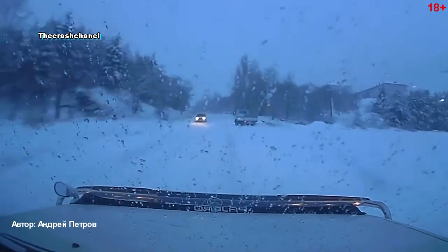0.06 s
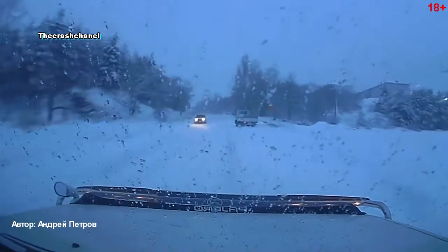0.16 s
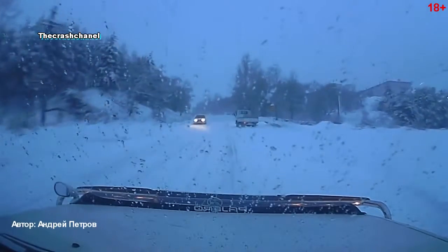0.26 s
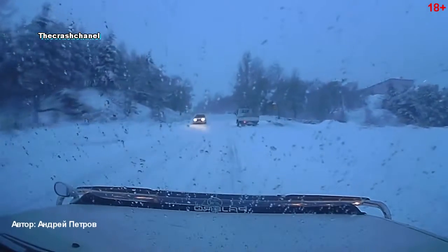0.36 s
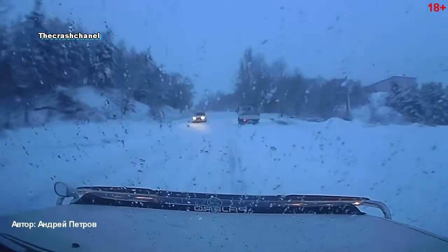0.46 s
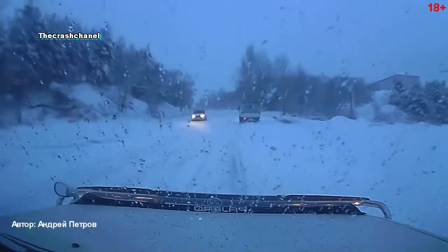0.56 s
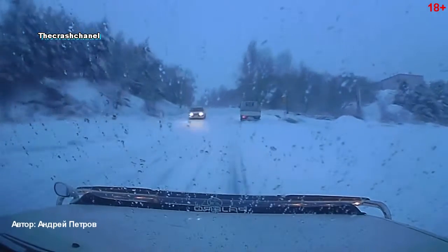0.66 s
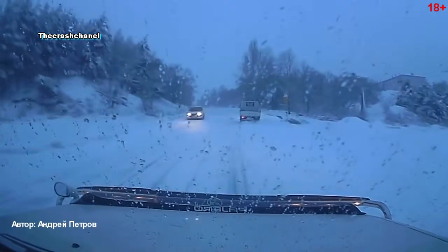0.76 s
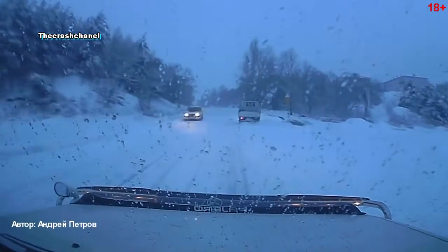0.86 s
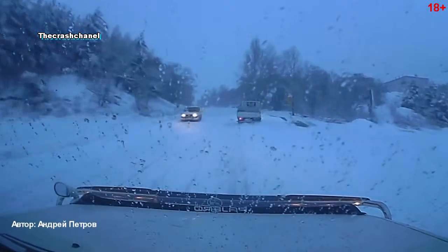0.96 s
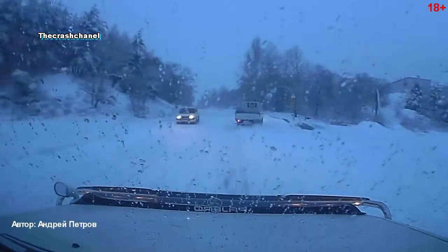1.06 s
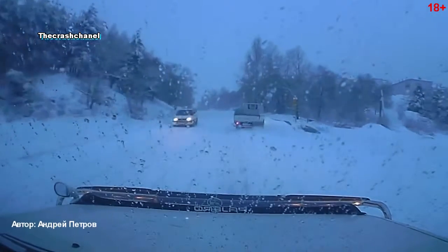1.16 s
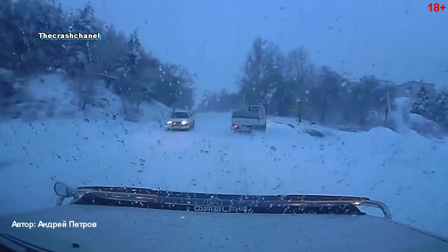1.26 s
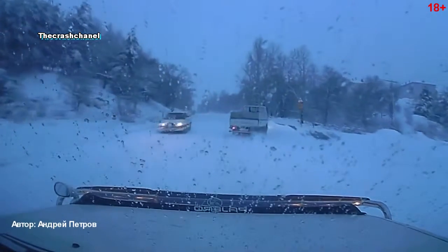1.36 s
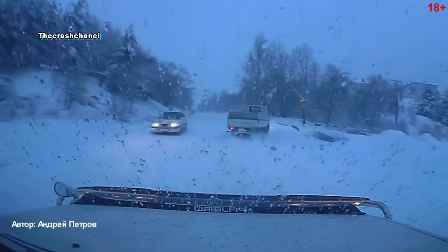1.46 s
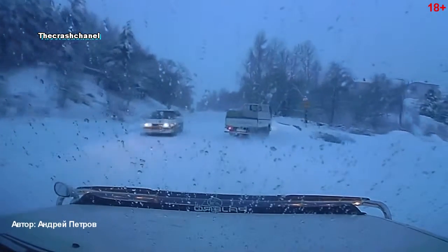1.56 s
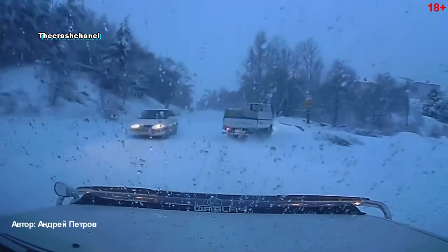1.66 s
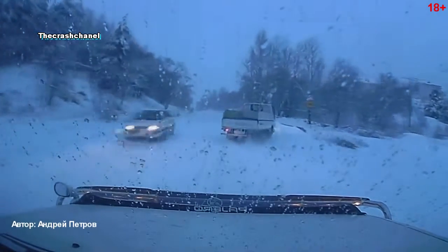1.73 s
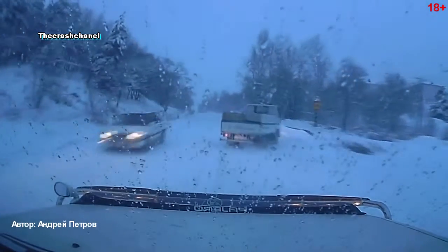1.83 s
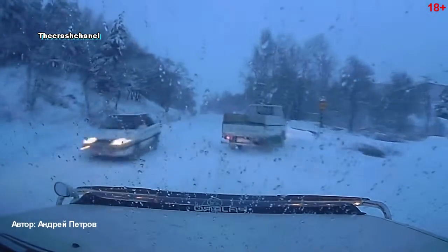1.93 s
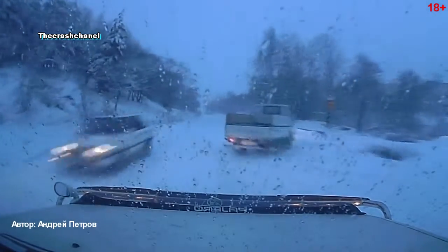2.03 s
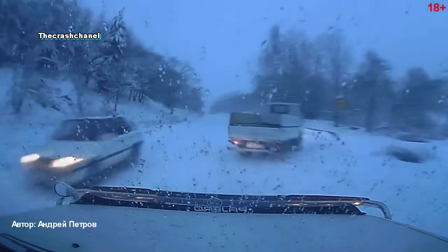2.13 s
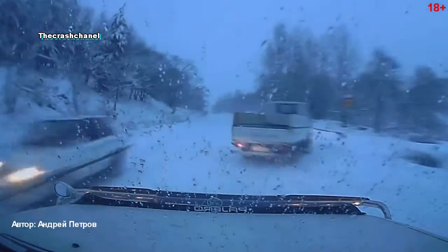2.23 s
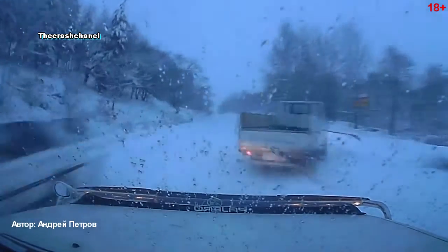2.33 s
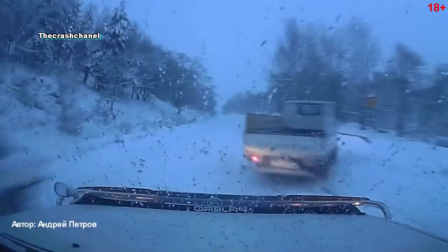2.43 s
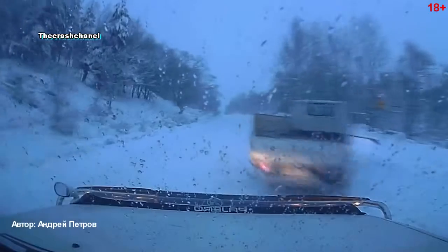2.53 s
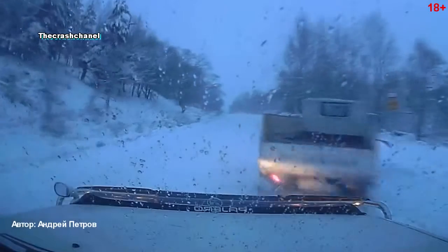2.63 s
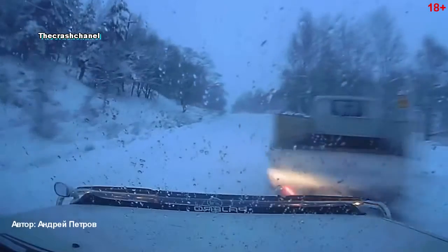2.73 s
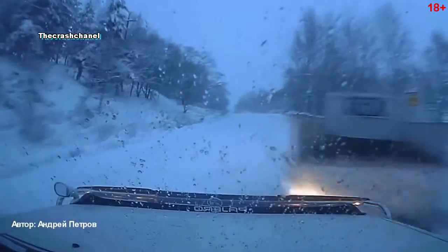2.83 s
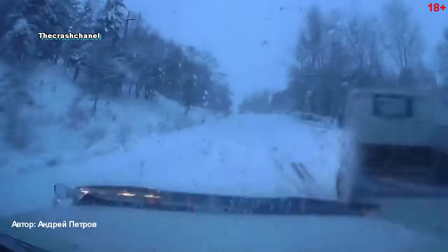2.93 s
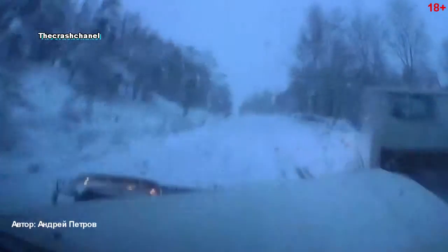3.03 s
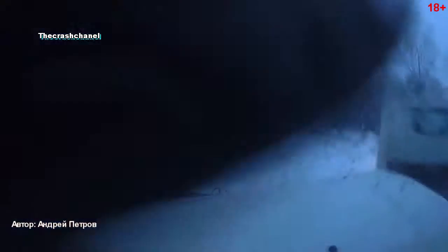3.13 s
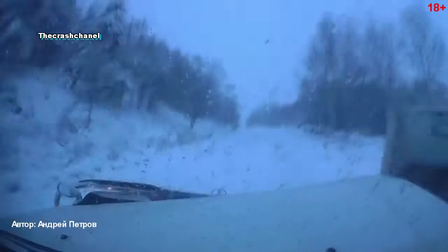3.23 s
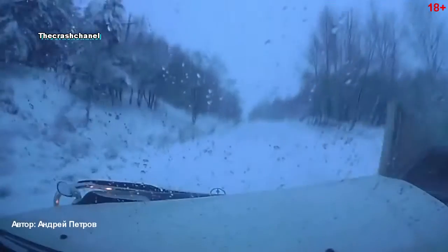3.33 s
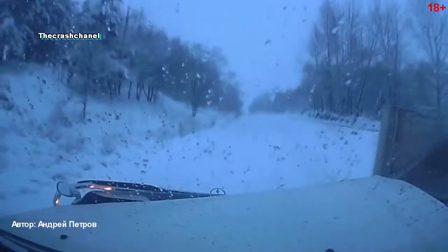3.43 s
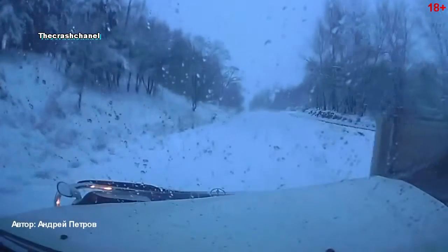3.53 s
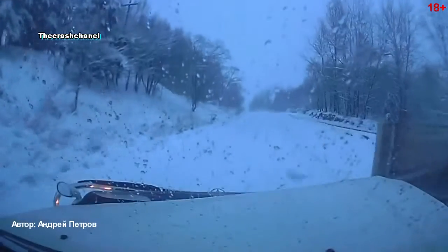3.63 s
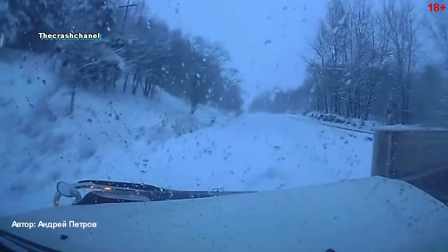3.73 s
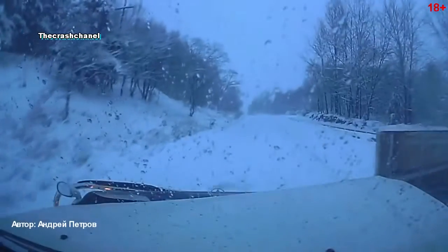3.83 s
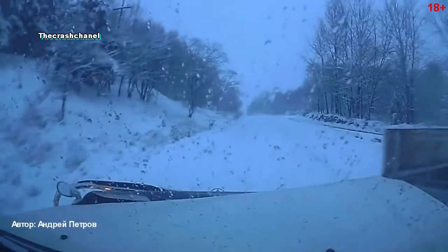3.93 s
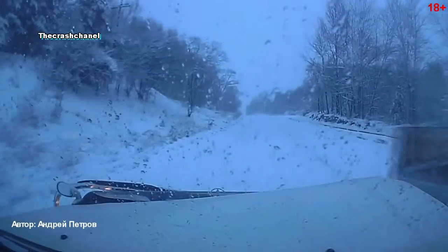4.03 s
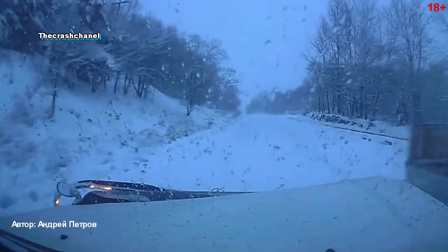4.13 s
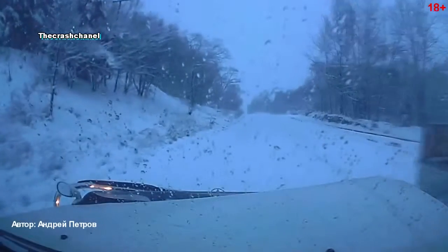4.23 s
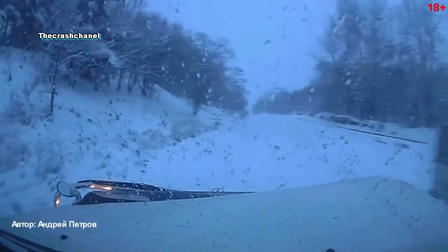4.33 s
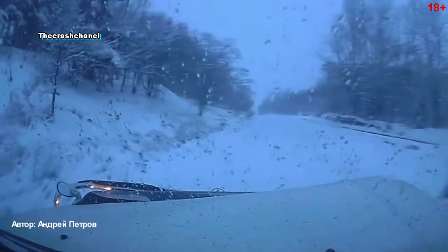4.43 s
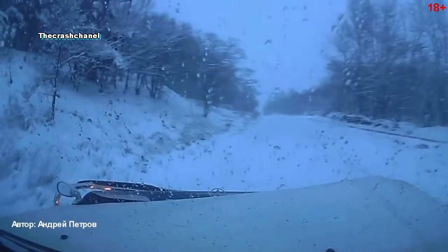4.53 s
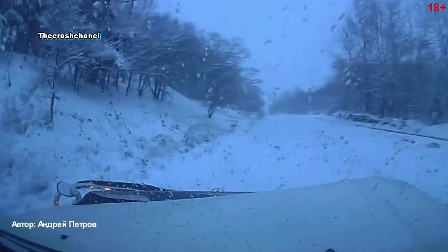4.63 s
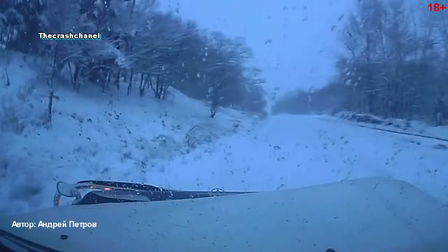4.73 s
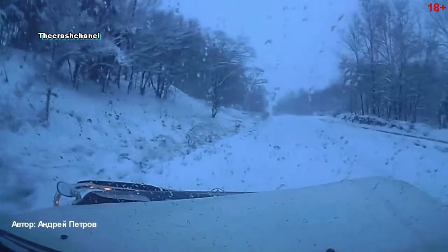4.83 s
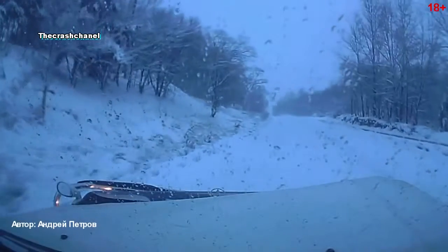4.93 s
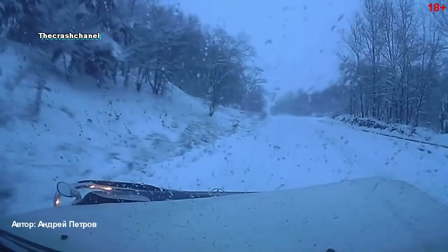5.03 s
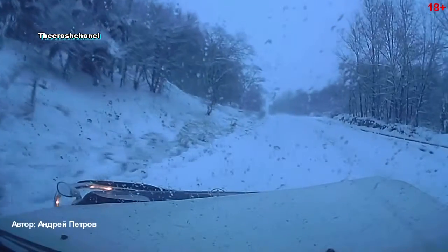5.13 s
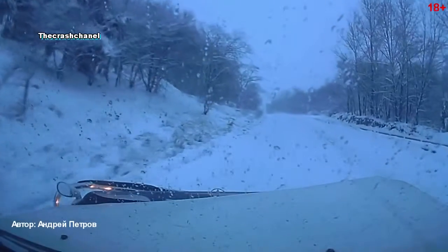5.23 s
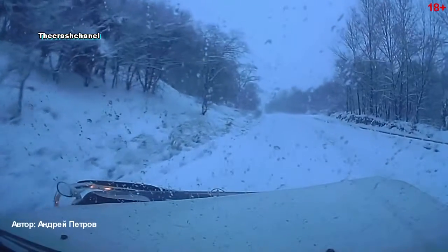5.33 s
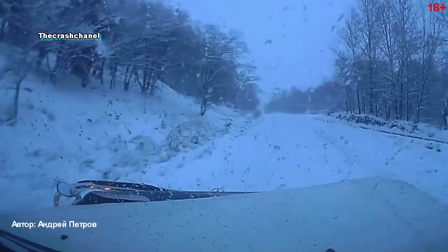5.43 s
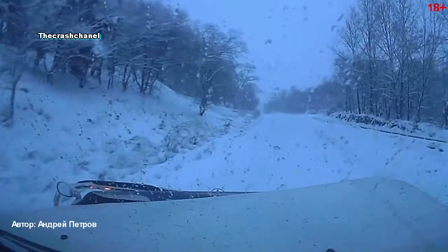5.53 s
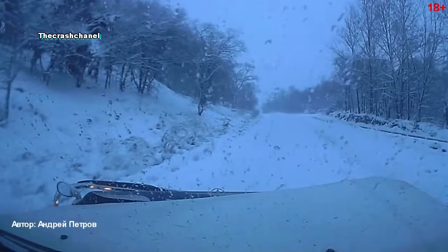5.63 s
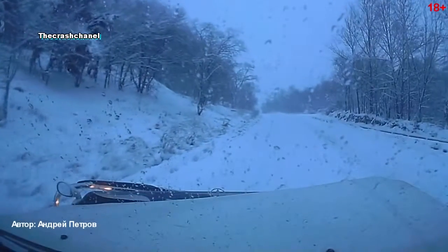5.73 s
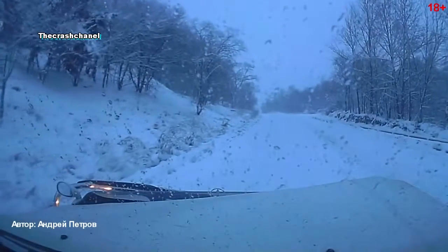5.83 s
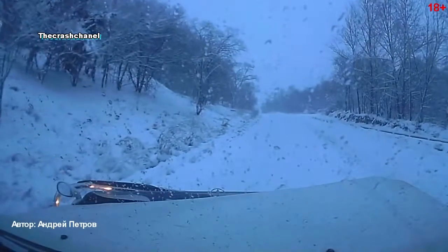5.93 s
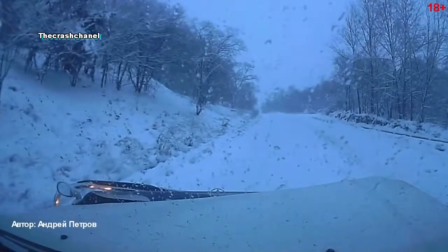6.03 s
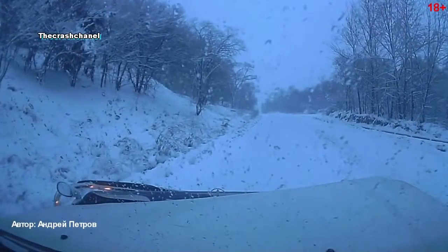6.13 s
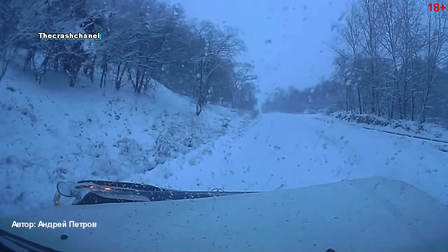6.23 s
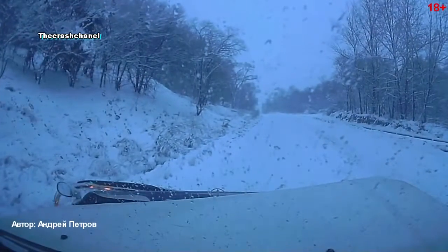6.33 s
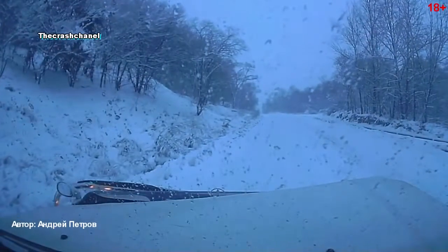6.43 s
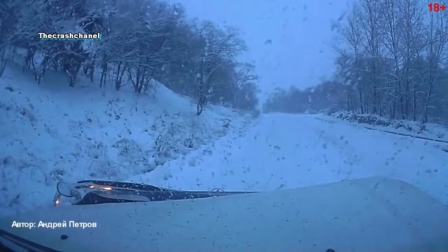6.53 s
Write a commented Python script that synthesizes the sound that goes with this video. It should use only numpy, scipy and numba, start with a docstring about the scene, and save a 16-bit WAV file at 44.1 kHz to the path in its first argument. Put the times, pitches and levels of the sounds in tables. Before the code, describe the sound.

Inside a car sliding on snow, quiet muffled road noise and faint rattles break into a violent metallic crash, tinkling glass, then snow crunching and juddering.

```python
"""A car's front crumples against the back of a small truck: grain bursts in a body-shell filter, plus pressure steps.
Heard from the windscreen while sliding on packed snow: parts clatter (noise bursts), glass tinkles (sine modes).
Tyres then judder (slip pulses) and crunch (grains) through deep snow until the car stands; dull low blows
(sagging sines) fall before, during and after. Behind: engine (sine orders), squeaks, thrown snow and road (noise).
The microphone stage clips and recovers slowly."""
import sys
import numpy as np
from scipy import signal
from scipy.fft import rfft, irfft, next_fast_len
from scipy.io import wavfile
from scipy.ndimage import map_coordinates
from numba import njit

SR = 44100
rng = np.random.default_rng(int(sys.argv[2]) if len(sys.argv) > 2 else 0)


def persist_wave(psi):
    """Save psi, clipped to +-1, as 16-bit WAV."""
    counts = np.round(np.clip(psi, -1, 1) * 32767).astype(np.int16)
    wavfile.write(sys.argv[1], SR, np.atleast_2d(counts).T)


N = 289957
TOP_HZ = 16000  # upper band limit

# folding strokes, then settling of the wreck: (time [s], force [dB], release [dB/s])
CRUSH_STROKES = [(3.019, -11.5, 99.5), (3.069, 7, 800), (3.112, -2.5, 368.5), (3.175, -20.5, 398.5),
                 (3.249, -23.5, 200), (3.355, -33.5, 170), (3.442, -33, 121), (3.623, -38, 130),
                 (3.711, -40.5, 206)]
# body shell spectrum: (frequency [Hz], relative density [dB per Hz])
SHELL_SPECTRUM = [(25, -7), (40, -6), (68, -19), (125, -1.5), (185, -6), (280, 4.5), (450, 2), (600, -6),
                  (900, -9), (1400, -20.5), (2200, -37.5), (4500, -39), (7000, -51), (15000, -65.5)]
# sharpest folds and breaks: (time [s], size [dB], time to give way [ms])
SHARP_SNAPS = [(3.0203, -9, 0.069), (3.0499, -3.5, 0.11), (3.055, 14, .016), (3.061, 4.5, .062),
               (3.0666, 6, 0.062), (3.07, 2, .032), (3.1041, -1.5, .24), (3.121, 1.5, 0.11),
               (3.1252, 1, 0.1), (3.1346, -3, 0.11), (3.172, -5, 0.26), (3.231, -11.5, .3)]
CONTACT_S, CONTACT_RISE_DB_PER_S = 3.019, 4001  # bumper meets truck
CRUSH_RISE_DB_PER_S = 383.5
SHUDDER_DB, SHUDDER_FALL_DB_PER_S = -19.5, 49.5
# lesser breaks: largest size over the crushing force, time to give way, period they fall in
SMALL_SNAP_MAX_DB, SMALL_SNAP_MS, FOLDING_S = -1.5, .13, .16

HEAVE_S, HEAVE_HZ, HEAVE_DB = 3.09, 36.2, -22
HEAVE_RISE_DB_PER_S, HEAVE_FALL_DB_PER_S = 349, 107

# loose parts and trim:
# (time [s], clack level [dB], clack pitch [Hz], click level before colouring [dB], click upper edge [Hz])
PART_RATTLES = [(1.89, -53, 650, -53.5, 8000), (2.03, -54.5, 785, -69, 4000), (2.052, -55, 1060, -62, 4000),
                (2.115, -64, 1120, -72, 3000), (2.461, -60, 1110, -66, 3500), (2.705, -31, 500, -47, 9050),
                (2.8, -53.5, 1090, -70, 2200), (2.835, -54, 890, -68, 2200), (2.86, -56.5, 1210, -63, 2200),
                (3.162, -40, 597, -29, 7000), (3.231, -21.5, 540, -33, 6000),
                (3.251, -27.5, 620, -30.5, 14100), (3.283, -27, 590, -35, 5000),
                (3.347, -31, 585, -58, 5000), (3.413, -31.5, 500, -36.5, 2600),
                (3.437, -33, 513, -40, 2600), (3.458, -40.5, 550, -38.5, 2870),
                (3.602, -34.5, 538, -51, 5000), (3.771, -59, 560, -51, 5000),
                (3.826, -49.5, 740, -68, 2000), (4.18, -44.5, 606, -44, 2340),
                (4.257, -42.5, 563, -43, 3400), (4.319, -43, 840, -50, 3400),
                (4.389, -40.5, 655, -43.5, 3200), (5.136, -33.5, 520, -36.5, 2660),
                (5.148, -34, 462, -49, 2400), (6.547, -50.5, 805, -61, 4040)]
# panel hit by a part: (frequency [Hz], relative density [dB per Hz])
TRIM_SPECTRUM = [(250, -16), (480, 9), (800, -4), (1250, -3), (1700, -24.5), (3000, -46.5), (8000, -46)]
# contact click: (frequency [Hz], filter gain [dB])
CLICK_RESPONSE = [(900, -16.5), (1400, 3), (1780, -3.5), (2080, 3.5), (2500, 1.5), (2850, -8), (3300, -5.5),
                  (4800, -7.5), (9000, -15.5), (15000, -21)]
LOOSE_FROM_S, LOOSE_TO_S = .1, 4.7  # lighter rattles at random
LOOSE_CLACK_MAX_DB, LOOSE_CLICK_MAX_DB, LOOSE_EDGE_HZ = -64, -70.5, 2600
CLACK_Q, TRIM_DB = 7, -3  # band sharpness of a part's note; panel level relative to it

# larger shards of lamp glass: (time [s], pitch [Hz], nominal level [dB])
GLASS_SHARDS = [(3.16, 4740, -57), (3.233, 3160, -40), (3.236, 4400, -44.5), (3.27, 4610, -49),
                (3.285, 2246, -43.5), (3.305, 3190, -54), (3.387, 5520, -60), (3.315, 14230, -65),
                (3.345, 8440, -69), (3.412, 7030, -58), (3.43, 11180, -68), (3.48, 13550, -74),
                (3.495, 9700, -69), (3.558, 4610, -62.5)]
# close pair and overtone: (ratio to pitch [1], relative level [dB])
SHARD_PARTIALS = [(1, 0), (1.035, -9), (1.53, -16.5)]
# showers of small splinters: (time [s], level [dB])
SPLINTER_SHOWERS = [(3.06, -55), (3.25, -54), (3.46, -65.5)]
# T60 at the reference pitch, growing with pitch by this power
SHARD_T60_S, SHARD_PITCH_HZ, SHARD_RING_LAW = 0.26, 5000, 0.69
SHARD_FLUTTER_RAD = 0.6
CHIP_FROM_S, CHIP_SPREAD_S, CHIP_LOW_HZ, CHIP_HIGH_HZ = 3.17, 0.38, 4200, 14800
CHIP_DB, CHIP_FADE_DB = -66, 9  # first chips; loss by the last
SHOWER_RISE_DB_PER_S, SHOWER_FALL_DB_PER_S, SHOWER_S = 301, 67.5, 1

# bouts of stick and slip: (start [s], end [s], level [dB])
JUDDER_BOUTS = [(4.418, 4.634, -36.5), (4.946, 4.963, -43), (5.137, 5.372, -47.5)]
# tyre slip pulses: (frequency [Hz], relative density [dB per Hz])
SLIP_SPECTRUM = [(40, -19), (100, 7), (210, 1.5), (320, -1), (480, -17), (620, -6.5), (830, -24),
                 (1100, -27), (2000, -61), (5000, -75), (15000, -92)]
# tyres bite into a drift that slowly gives way: (time [s], crunch level [dB])
SNOW_DRIFTS = [(4.29, -35), (5.04, -38)]
# packing snow: (frequency [Hz], relative density [dB per Hz])
SNOW_SPECTRUM = [(30, -12.5), (60, -10), (130, -2.5), (170, -14), (215, -3.5), (300, 0), (490, -9.5),
                 (570, -18.5), (670, -18), (750, -23.5), (835, -19), (1000, -23), (1350, -35), (2300, -57),
                 (3000, -59), (6000, -66), (15000, -78)]
# rubber groan: (frequency [Hz], relative density [dB per Hz])
GROAN_SPECTRUM = [(650, -43), (770, -10), (815, 2.5), (840, 4.5), (870, -8), (930, -13), (1000, -10),
                  (1150, -43)]
# icy crust: (frequency [Hz], relative density [dB per Hz])
RASP_SPECTRUM = [(1100, -31), (1420, 6.5), (1720, -9), (2050, -2.5), (2300, -1.5), (2750, -18), (3070, -8),
                 (3500, -26), (8000, -46)]
PLOUGH_FROM_S, PLOUGH_TO_S = 4.19, 5.365
PLOUGH_RISE_DB_PER_S, PLOUGH_FALL_DB_PER_S = 450, 245
DRIFT_RISE_DB_PER_S, DRIFT_FALL_DB_PER_S = 71, 5
SLIP_HZ, JUDDER_RISE_DB_PER_S, JUDDER_FALL_DB_PER_S = 105.1, 168, 92
GROAN_DB, GROAN_ROUGH_DB, RASP_DB = -18.5, 3, -36  # levels relative to crunch; groan unevenness

# dull low blows from road, settling wreck and snow, and a last knock:
# (time [s], level [dB], centre pitch [Hz], length scale [ms])
LOW_THUMPS = [(2.044, -43, 416, 13), (2.133, -44.5, 402, 8.6), (2.372, -47, 466, 6),
              (2.571, -43, 336, 10.8), (2.622, -37, 311.5, 8.5), (2.715, -24, 274.7, 8.7),
              (3.585, -33.5, 300, 13), (3.628, -33, 299.7, 14), (3.735, -40.5, 269, 8.8),
              (4.252, -35, 291, 3.9), (4.272, -31.5, 300.7, 5), (5.072, -19.5, 310.2, 2.6),
              (5.136, -23, 303, 2.1), (5.21, -28, 387, 1.7), (5.232, -24, 349.7, 2),
              (6.55, -46.5, 397.6, 6.7)]
# ringing car body: (frequency [Hz], relative level [dB], T60 [s])
BODY_MODES = [(139, 12, 0.068), (231, 4, 0.025), (281, -7.5, 0.075), (330, -2, 0.047), (497, -5, 0.057),
              (513, -17, 0.1), (877, -27, 0.037)]
HOP_S, HOP_PERIOD_S, HOP_COUNT, HOP_HZ, HOP_MS = 5.029, .0322, 11, 334.9, 3  # wheel hop
HOP_DB, HOP_FADE_DB, FIRST_HOP_DB = -17.5, 1.15, -25.5  # level, loss per hop, light first touch
THUMP_SAG_OCTAVES, BODY_DB = .5, -11.5  # sag either side of centre pitch; body peak relative to blow

# brakes and rubber: (time [s], pitch [Hz], level [dB])
SQUEAK_NOTES = [(.93, 4470, -77), (1.29, 4500, -75), (1.37, 4520, -76), (4.08, 903.7, -53),
                (5.42, 918, -60.5), (6.555, 850, -64)]
SQUEAK_RISE_DB_PER_S, SQUEAK_FALL_DB_PER_S = 700, 300

# snow thrown by the oncoming car: (time [s], level [dB])
SPRAY_SLAPS = [(2.044, -51), (2.12, -55)]
# thrown snow on side panels: (frequency [Hz], relative density [dB per Hz])
SLUSH_SPECTRUM = [(200, -17.5), (330, -3), (410, 4), (520, -10), (650, -15), (830, -13), (1200, -28),
                  (1600, -38), (6000, -38.5)]
SPRAY_RISE_DB_PER_S, SPRAY_FALL_DB_PER_S = 700, 163

# sag under braking, then idle: (time [s], firing rate [Hz], level [dB])
ENGINE_COURSE = [(.4, 49, -78), (.65, 46, -60.5), (1.3, 38, -61.5), (2.5, 42, -56.5), (3.3, 48, -62.5),
                 (5.2, 48.7, -56), (6.57, 47.8, -69)]
# half, first, second and third firing order: (relative level [dB])
ENGINE_ORDERS_DB = [-2.5, 1, -12, -20]
LIFT_S, BOOM_DB, BOOM_FALL_DB_PER_S = 0.36, -56, 98  # cabin boom until the throttle lifts
BOOM_OCTAVE_DB = -2.5  # relative to boom

# tyre noise: (time [s], level [dB])
ROAD_COURSE = [(0, -52), (.3, -54.5), (1.1, -58), (2.3, -57.5), (2.77, -49), (2.95, -56), (3.8, -55),
               (3.95, -60.5), (5.3, -60), (6.57, -61.5)]
# cabin-muffled tyres: (frequency [Hz], relative density [dB per Hz])
CABIN_SPECTRUM = [(15, -25), (27, -11.5), (48, -2.5), (70, -5.5), (115, -6.5), (175, -10.5), (240, -7),
                  (300, -5.5), (410, -6), (560, -13), (740, -22.5), (1050, -22), (1350, -34), (3000, -48),
                  (6000, -69.5)]

# microphone response: (frequency [Hz], gain [dB])
MICROPHONE_RESPONSE = [(5, -22), (22, -3), (40, 0.5), (5000, 0), (9000, -0.5), (15000, -2)]
# microphone hiss: (frequency [Hz], relative density [dB per Hz])
HISS_SPECTRUM = [(500, 3.5), (2000, -0.5), (4500, -2.5), (6000, -5), (8000, -3), (10000, -6), (14800, -5.5),
                 (15800, -8.5)]


def amp(db):
    """Decibels to gain."""
    return 10 ** (np.asarray(db) / 20)


def unit(x):
    """Scale to rms 1."""
    return x / np.sqrt(np.mean(x ** 2) + 1e-20)


def curves(rows):
    """One value per sample for each column after the time."""
    s, *cols = np.transpose(rows)
    return [np.interp(np.arange(N) / SR, s, c) for c in cols]


def wobble(rate, size=N):
    """Smooth random curve with rate knots per second."""
    knots = rng.standard_normal(int(size * rate / SR) + 4)
    return map_coordinates(knots, [np.arange(size) * rate / SR])


def colour(x, points):
    """Minimum-phase filter through (frequency [Hz], gain [dB]) points."""
    m = 2 * next_fast_len(len(x) // 2 + 4096)
    hz, db = np.transpose(points)
    gain_db = np.interp(np.log(np.fft.rfftfreq(m, 1 / SR) + 1), np.log(hz), db)
    cepstrum = irfft(np.log(amp(gain_db)))
    # folding the cepstrum makes the filter causal
    cepstrum[1:m // 2] *= 2
    cepstrum[m // 2 + 1:] = 0
    return irfft(rfft(x, m) * np.exp(rfft(cepstrum)))[:len(x)]


def noise(points, envelope=1):
    """Enveloped, then coloured noise; rms 1 for a steady envelope of 1."""
    white = rng.standard_normal(N)
    return colour(envelope * white, points) / np.std(colour(white, points))


def grains(rate, spread_db):
    """Tiny random fractures of uneven size, rate per second on average."""
    hits = rng.random(N) < rate / SR
    signs = rng.choice([-1, 1], N)
    return hits * signs * amp(spread_db * rng.standard_normal(N).clip(-2, 2))


def add(track, s, sound):
    """Mix a sound into the track at time s."""
    room = track[round(s * SR):][:len(sound)]
    room += sound[:len(room)]


def ring(modes, t, scatter_db, detune):
    """Decaying sine modes struck once, with random strength, sign and slight detuning."""
    hz, db, t60 = np.transpose(modes)[:, :, None]
    size, shift = rng.standard_normal((2, len(modes), 1))
    gain = amp(db + scatter_db * size) * rng.choice([-1, 1], (len(modes), 1))
    decay = np.exp(-np.log(1000) * t / t60)
    return np.sum(gain * decay * np.sin(2 * np.pi * hz * (1 + detune * shift) * t), axis=0)


def saturate(x, top, order):
    """Soft clipping at +-top; a higher order gives a harder knee."""
    return x / (1 + np.abs(x / top) ** order) ** (1 / order)


def swell(start, end, rise, fall):
    """Gain that rises to 1 at start, holds until end and falls; slopes in dB/s."""
    t = np.arange(N) / SR
    return amp(-abs(rise) * np.maximum(start - t, 0) - abs(fall) * np.maximum(t - end, 0))


def strongest(events, rise, fall):
    """Largest of the swells at (time [s], level [dB]) events."""
    return np.max([amp(db) * swell(s, s, rise, fall) for s, db in events], axis=0)


def crushing_force():
    """Strokes load up and release over a fading shudder, gated steeply at contact."""
    strokes = [amp(db) * swell(s, s, CRUSH_RISE_DB_PER_S, release) for s, db, release in CRUSH_STROKES]
    shudder = amp(SHUDDER_DB) * swell(CONTACT_S, CONTACT_S, 0, SHUDDER_FALL_DB_PER_S)
    contact = swell(CONTACT_S, CONTACT_S, CONTACT_RISE_DB_PER_S, 0)
    return contact * np.max(strokes + [shudder], axis=0)


def crash():
    """Buckling sheet metal shakes the shell; sharp breaks load up, then let go in a pressure step."""
    force = crushing_force()
    buckling = force * unit(colour(grains(rate=2500, spread_db=3.5), SHELL_SPECTRUM))
    snaps = [(s, amp(db), give_ms) for s, db, give_ms in SHARP_SNAPS]
    for when, size in rng.random(size=(14, 2)):
        s = CONTACT_S + when * FOLDING_S
        gain = amp(SMALL_SNAP_MAX_DB - 2.8 * size) * force[round(s * SR)]
        snaps.append((s, gain, SMALL_SNAP_MS))
    breaks = np.zeros(N)
    t = np.arange(-SR // 100, SR // 100) / SR
    for s, gain, give_ms in snaps:
        step = np.tanh(t * 10 ** 3 / give_ms)
        add(breaks, s + t[0], gain * step * np.exp(-np.abs(t) / .0009))
    return buckling + breaks


def heave():
    """The blow swings the whole car on its mounts at one very low note."""
    t = np.arange(N) / SR
    envelope = amp(HEAVE_DB) * swell(HEAVE_S, HEAVE_S, HEAVE_RISE_DB_PER_S, HEAVE_FALL_DB_PER_S)
    return envelope * np.sin(2 * np.pi * HEAVE_HZ * t + .3 * wobble(12))


def rattles():
    """Loose parts give a hollow band-passed clack, a panel knock and a shorter low-passed click."""
    notes, clack, click = np.zeros(N), np.zeros(N), np.zeros(N)
    t = np.arange(SR // 4) / SR
    light = []
    for when, size, pitch in rng.random(size=(24, 3)):
        s = LOOSE_FROM_S + when * (LOOSE_TO_S - LOOSE_FROM_S)
        clack_db, click_db = LOOSE_CLACK_MAX_DB - 5 * size, LOOSE_CLICK_MAX_DB - 5 * size
        light.append((s, clack_db, 600 * 2 ** pitch, click_db, LOOSE_EDGE_HZ))
    for s, clack_db, hz, click_db, edge_hz in PART_RATTLES + light:
        decay = amp(clack_db) * np.exp(-t / 0.0099)
        band_hz = [hz / (1 + 1 / CLACK_Q), hz * (1 + 1 / CLACK_Q)]
        hollow = signal.butter(2, band_hz, "bandpass", fs=SR, output="sos")
        note = unit(signal.sosfilt(hollow, decay * rng.standard_normal(len(t))))
        add(notes, s, np.sqrt(np.mean(decay ** 2)) * note)
        add(clack, s, amp(TRIM_DB) * decay)
        contact = signal.butter(4, min(edge_hz, TOP_HZ), fs=SR, output="sos")
        burst = np.exp(-t / 0.0066) * rng.standard_normal(len(t))
        add(click, s, amp(click_db) * signal.sosfilt(contact, burst))
    return notes + noise(TRIM_SPECTRUM, clack) + colour(click, CLICK_RESPONSE)


def glass():
    """Tumbling shards and chips ring with fluttering phase amid a dense shower of decaying sines."""
    shards, splinters = np.zeros(N), np.zeros(N)
    t = np.arange(SR // 2) / SR
    chips = []
    for when, pitch in rng.random(size=(40, 2)):
        hz = CHIP_LOW_HZ + pitch * (CHIP_HIGH_HZ - CHIP_LOW_HZ)
        chips.append((CHIP_FROM_S + when * CHIP_SPREAD_S, hz, CHIP_DB - CHIP_FADE_DB * when))
    for s, hz, db in GLASS_SHARDS + chips:
        t60 = SHARD_T60_S * (hz / SHARD_PITCH_HZ) ** SHARD_RING_LAW
        tumble = amp(3 * wobble(90, len(t))) * (1 - np.exp(-t / .01))
        flutter_s = SHARD_FLUTTER_RAD * wobble(200, len(t)) / (2 * np.pi * hz)
        modes = [(hz * ratio, db + level, t60) for ratio, level in SHARD_PARTIALS if hz * ratio < TOP_HZ]
        add(shards, s, tumble * ring(modes, t + flutter_s, scatter_db=4.0, detune=0.0034))
    t = t[:SR // 8]
    for when, pitch, size, life in rng.random(size=(1500, 4)):
        hz = 2800 * (15000 / 2800) ** pitch
        t60 = .02 + .12 * life
        tink = amp(-9 * size - 6 * pitch - 60 * t / t60) * (1 - np.exp(-t / .002))
        add(splinters, CONTACT_S + when * SHOWER_S, tink * np.sin(2 * np.pi * hz * t))
    shower = strongest(SPLINTER_SHOWERS, SHOWER_RISE_DB_PER_S, SHOWER_FALL_DB_PER_S)
    return shards + shower * splinters / np.std(splinters[splinters != 0])


def ploughing():
    """Tyres stick and slip unevenly in deep snow, over packing grains, rubber groan and crust rasp."""
    moving = swell(PLOUGH_FROM_S, PLOUGH_TO_S, PLOUGH_RISE_DB_PER_S, PLOUGH_FALL_DB_PER_S)
    load = strongest(SNOW_DRIFTS, DRIFT_RISE_DB_PER_S, DRIFT_FALL_DB_PER_S)
    bouts = [amp(db) * swell(start, end, JUDDER_RISE_DB_PER_S, JUDDER_FALL_DB_PER_S)
             for start, end, db in JUDDER_BOUTS]
    grip = np.max(bouts, axis=0)
    # one slip pulse per whole turn
    turns = SLIP_HZ * np.arange(N) / SR + 0.045 * wobble(110) + 0.24 * wobble(10)
    slips = np.diff(np.floor(turns), prepend=np.floor(turns[0])) * amp(0.82 * wobble(110))
    # the cabin drones at the slip rate
    drone = .4 * np.cos(2 * np.pi * turns)
    judder = grip * (unit(colour(slips - slips.mean(), SLIP_SPECTRUM)) + drone)
    crunch = load * unit(colour(grains(rate=900, spread_db=1), SNOW_SPECTRUM))
    groan = load * amp(GROAN_DB + GROAN_ROUGH_DB * wobble(70)) * noise(GROAN_SPECTRUM)
    # icy crust against the underside
    crust = unit(colour(grains(rate=260, spread_db=1.5), RASP_SPECTRUM))
    rasp = load * amp(RASP_DB + 4.2 * wobble(22)) * crust
    return moving * (judder + crunch + groan + rasp)


def thumps():
    """Dull low blows and a hopping wheel: a few cycles sagging in pitch, with a faint ring of the body."""
    out = np.zeros(N)
    t = np.arange(-SR // 20, SR // 6) / SR
    hops = []
    for k in range(HOP_COUNT):
        db = HOP_DB - HOP_FADE_DB * k if k else FIRST_HOP_DB
        hops.append((HOP_S + k * HOP_PERIOD_S, db, HOP_HZ, HOP_MS))
    for s, db, hz, length_ms in LOW_THUMPS + hops:
        u = t * 10 ** 3 / length_ms
        pitch_hz = hz * 2 ** (-THUMP_SAG_OCTAVES * np.tanh(u / 2))
        phase = 2 * np.pi * (np.cumsum(pitch_hz) / SR + rng.random()) + 0.44 * wobble(300, len(t))
        # rises faster than it falls
        blow = np.sin(phase) / np.cosh(np.where(u < 0, 1.9 * u, u))
        body = ring(BODY_MODES, np.maximum(t, 0), scatter_db=8.0, detune=0.069)
        add(out, s + t[0], amp(db) * (blow + amp(BODY_DB) * body / np.abs(body).max()))
    return out


def squeaks():
    """Brakes and rubber under strain: short sines with rough level and phase."""
    t = np.arange(N) / SR
    out = np.zeros(N)
    for s, hz, db in SQUEAK_NOTES:
        envelope = amp(db + 2.4 * wobble(120)) * swell(s, s, SQUEAK_RISE_DB_PER_S, SQUEAK_FALL_DB_PER_S)
        out += envelope * np.sin(2 * np.pi * hz * t + 1.0 * wobble(180))
    return out


def spray():
    """The oncoming car throws snow on the side panels: short swells of coloured noise."""
    slaps = sum(amp(db) * swell(s, s, SPRAY_RISE_DB_PER_S, SPRAY_FALL_DB_PER_S) for s, db in SPRAY_SLAPS)
    return noise(SLUSH_SPECTRUM, slaps * amp(1.3 * wobble(70)))


def engine():
    """Low firing orders as sines; the third and its octave boom until the throttle lifts."""
    firing_hz, level_db = curves(ENGINE_COURSE)
    phase = 2 * np.pi * np.cumsum(firing_hz * (1 + .008 * wobble(2.3))) / SR
    orders = zip((.5, 1, 2, 3), ENGINE_ORDERS_DB)
    hum = sum(amp(db + 2.5 * wobble(8)) * np.sin(k * phase) for k, db in orders)
    boom_gain = amp(BOOM_DB) * swell(0, LIFT_S, 0, BOOM_FALL_DB_PER_S)
    boom = np.sin(3 * phase) + amp(BOOM_OCTAVE_DB) * np.sin(6 * phase + wobble(25))
    return amp(level_db) * hum + boom_gain * boom


def road():
    """Tyres roll and slide over packed snow: wavering noise muffled by the cabin."""
    level_db, = curves(ROAD_COURSE)
    return amp(level_db + 2.2 * wobble(16)) * noise(CABIN_SPECTRUM)


def scene():
    """Sum of all sources at the microphone, one channel."""
    impact = crash() + heave() + rattles() + glass()
    motion = ploughing() + thumps() + squeaks() + spray()
    return (impact + motion + engine() + road())[None]


@njit
def recover(x, fall):
    """Follow x upward at once; sink by at most fall per sample."""
    y = x.copy()
    for i in range(1, len(x)):
        y[i] = max(x[i], y[i - 1] - fall)
    return y


def record(dry):
    """The overloaded microphone stage clips and recovers slowly, bending loud sound to a ragged sawtooth."""
    top, fall_per_s, lag_share = .44, 330, .95
    clipped = saturate(dry[0], top, order=3)
    # the coupling capacitor drains the offset that the slow recovery builds up
    capacitor = signal.butter(1, 70, "highpass", fs=SR, output="sos")
    lag = signal.sosfilt(capacitor, recover(clipped, fall_per_s / SR) - clipped)
    overloaded = saturate(colour(clipped + lag_share * lag, MICROPHONE_RESPONSE), top, order=8)
    out = overloaded + amp(-73.0) * noise(HISS_SPECTRUM)
    # linear roll-off over the last 250 Hz below TOP_HZ
    band = np.clip((TOP_HZ - np.fft.rfftfreq(N, 1 / SR)) / 250, 0, 1)
    return irfft(rfft(out) * band, N)[None]


dry = scene()
out = record(dry)
persist_wave(out)
```